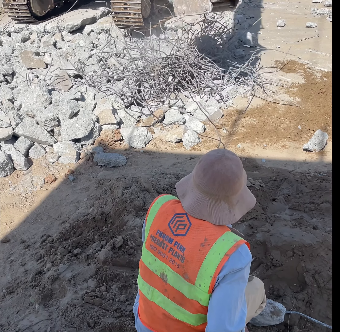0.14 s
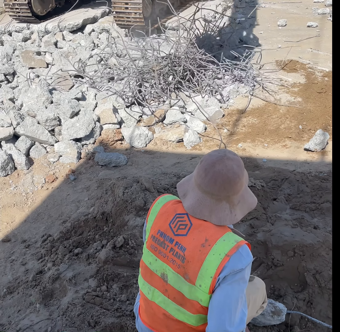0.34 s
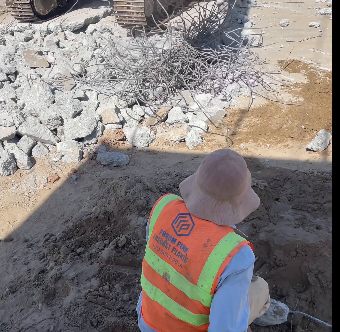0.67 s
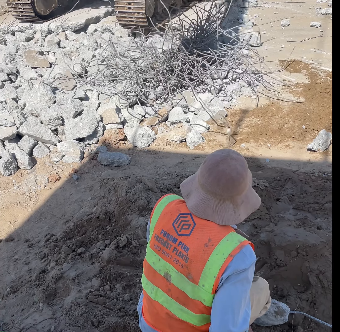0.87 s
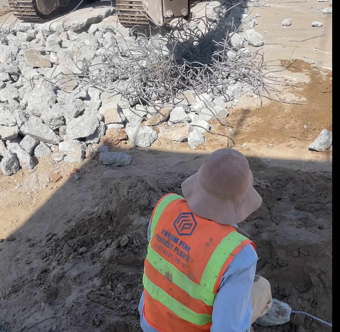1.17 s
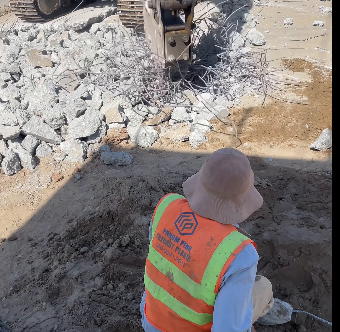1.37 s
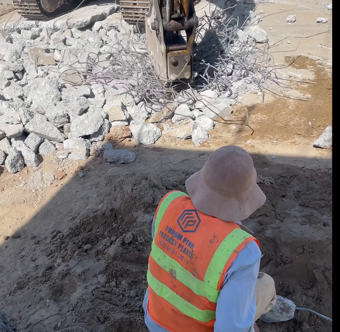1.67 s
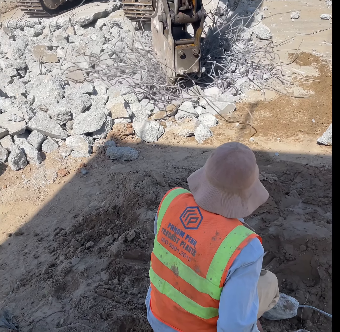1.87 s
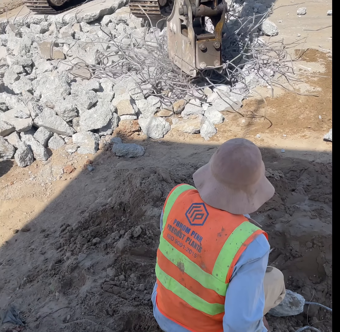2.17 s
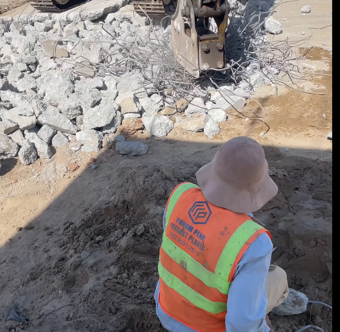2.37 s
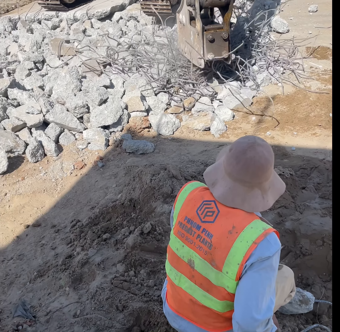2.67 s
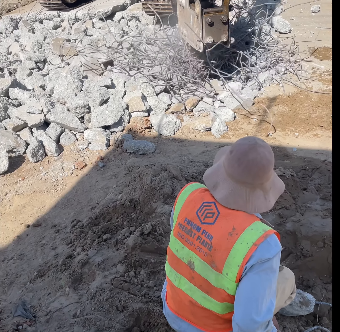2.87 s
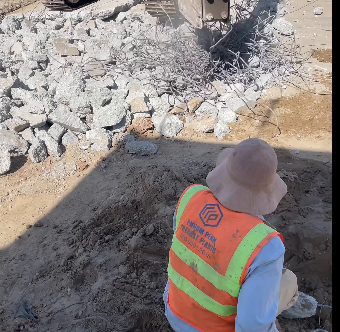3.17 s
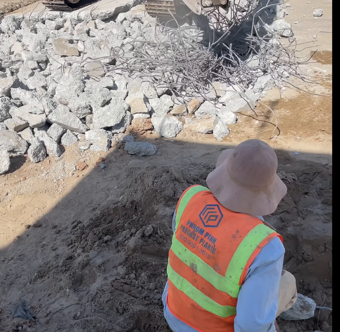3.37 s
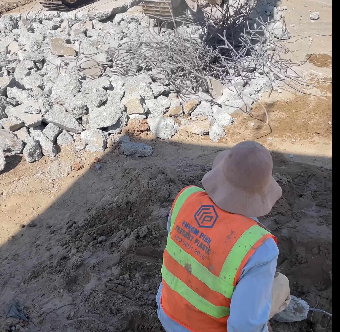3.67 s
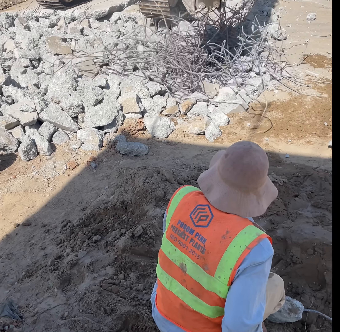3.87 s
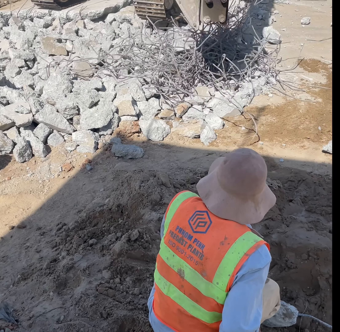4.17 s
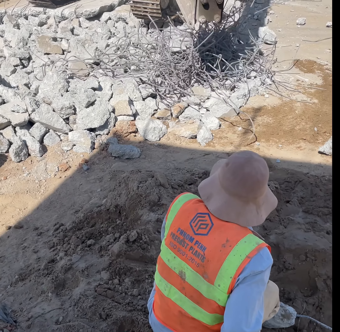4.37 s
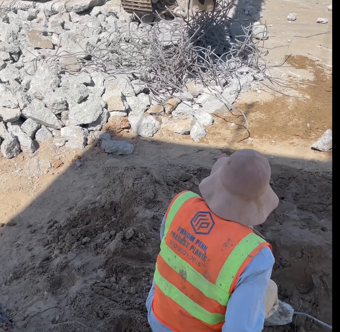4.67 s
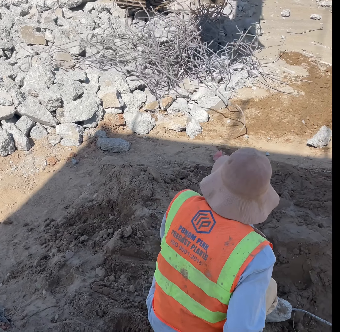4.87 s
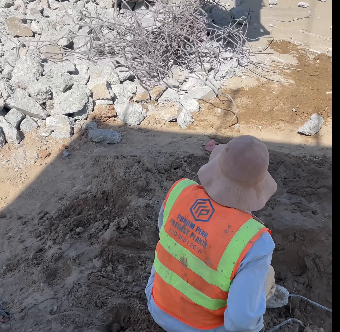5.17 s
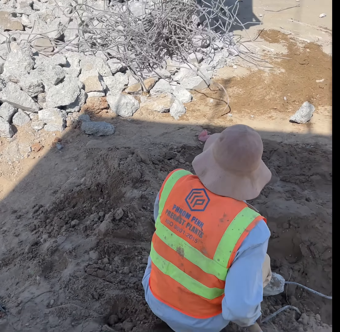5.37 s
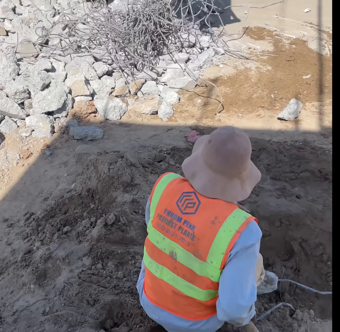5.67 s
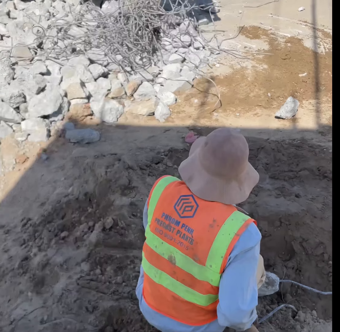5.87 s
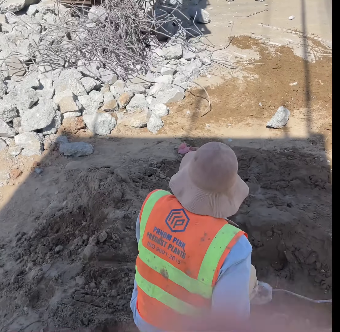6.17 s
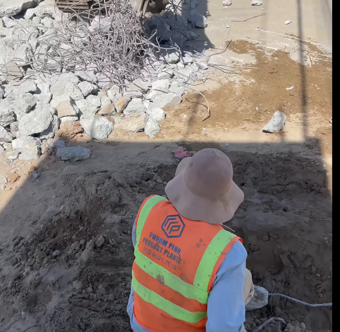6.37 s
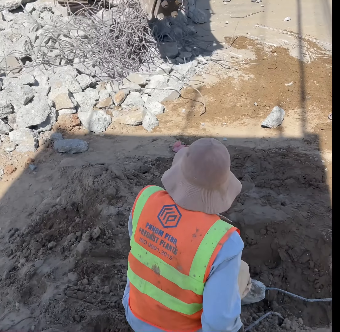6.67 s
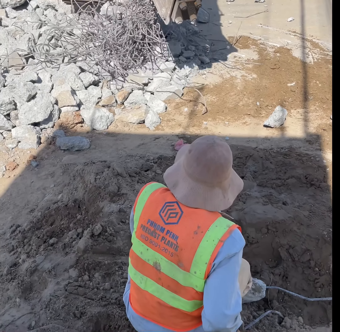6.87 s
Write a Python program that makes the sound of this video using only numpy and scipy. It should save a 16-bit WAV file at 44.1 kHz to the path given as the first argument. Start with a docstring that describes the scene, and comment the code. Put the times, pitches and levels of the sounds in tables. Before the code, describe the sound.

Outdoors, steel jaws break reinforced concrete over a throbbing engine: hard cracks, clanking knocks, ringing rebar and rubble trickling between uneven bites.

```python
"""Excavator crunching reinforced concrete

Outdoors, taken on two microphone ports close together. A diesel drones as wavering tones over throbbing noise,
with a pump whine. The steel jaw crunches concrete: bursts of coloured noise rumble, crumble and pour as grit.
Cracks are decaying noise, knocks and thuds short damped tones; struck and rubbed reinforcing bars
ring as resonant modes. Each source has a direct part and a part scattered by other paths."""
import sys
import numpy as np
from scipy import signal
from scipy.fft import rfft, irfft, next_fast_len
from scipy.io import wavfile
from scipy.ndimage import uniform_filter1d

SR = 44100
rng = np.random.default_rng(int(sys.argv[2]) if len(sys.argv) > 2 else 0)


def store_pcm(level_fs):
    """Save levels as 16-bit WAV."""
    pcm = np.round(np.clip(level_fs, -1, 1) * 32767).astype(np.int16)
    wavfile.write(sys.argv[1], SR, np.atleast_2d(pcm).T)


N = 310023  # length [samples]


def amp(db):
    """Decibels to amplitude."""
    return 10 ** (np.asarray(db) / 20)


def evened(x):
    """Scales x to rms 1."""
    return x / np.sqrt(np.mean(x ** 2) + 1e-20)


def read(points, hz):
    """Reads a frequency curve, interpolated along log frequency."""
    f, value = np.transpose(points)
    return np.interp(np.log(hz + 1), np.log(f + 1), value)


def columns(rows):
    """Each column of a table over time, one value a sample."""
    s, *rest = np.transpose(rows)
    return [np.interp(np.arange(N) / SR, s, c) for c in rest]


def colour(x, points):
    """Shapes x by a spectrum in dB."""
    size = next_fast_len(x.shape[-1])
    gain = amp(read(points, np.fft.rfftfreq(size, 1 / SR)))
    return irfft(rfft(x, size) * gain, size)[..., :x.shape[-1]]


def drift(width_s):
    """Slow random wander of rms 1."""
    size = max(int(width_s * SR), 1)
    once = uniform_filter1d(rng.standard_normal(N), size)
    return evened(uniform_filter1d(once, size))


def grains(per_s, spread_db, fade_s):
    """Noise in bursts of uneven size; direct and scattered sound share the bursts, not the fine noise."""
    sizes = amp(2 * spread_db * np.minimum(rng.exponential(1, N), 4))
    starts = (rng.random(N) < per_s / SR) * sizes
    power = signal.lfilter([1], [1, -np.exp(-1 / (fade_s * SR))], starts)
    power = uniform_filter1d(power, max(int(0.62 * fade_s * SR), 1))  # each burst starts softly
    return np.sqrt(abs(power)) * rng.standard_normal((2, N))


def ring(force, hz, t60):
    """One damped mode; a unit click rings with height about 1."""
    r, turn = np.exp(-np.log(1000) / (t60 * SR)), 2 * np.pi * hz / SR
    return signal.lfilter([0, np.sin(turn)], [1, -2 * r * np.cos(turn), r * r], force)


def uneven_blows(shape, most):
    """Blow strengths with a random sign for each path; most caps the random size."""
    return amp(3.5 * np.minimum(rng.exponential(1, shape), most)) * rng.choice([-1, 1], (2, *shape))


def add_at(out, s, sound):
    """Lays a sound into out from time s."""
    start = round(s * SR)
    out[:, start:start + sound.shape[-1]] += sound


def wavering_tone(angle, db):
    """A sine whose level wavers at random; its scattered part also drifts in phase."""
    wander = np.array([[0], [2.5]]) * drift(0.052)  # radians rms
    level = amp(db + 2.5 * drift(0.049))
    return np.sqrt(2) * level * np.sin(angle + wander)


# exhaust tones: (time [s], firing rate [Hz], firing tone level [dB], half-rate tone level [dB])
ENGINE_COURSE = [(0, 115.1, -26, -27.5), (.3, 116.3, -33.5, -36), (.6, 108.6, -25.5, -33),
                 (.95, 106.7, -27, -29), (1.38, 106.6, -23.5, -26.5), (1.68, 111.4, -32.5, -31),
                 (1.8, 107.5, -23, -27.5), (2.05, 100.9, -29, -30), (2.33, 98.94, -22, -28.5),
                 (2.62, 108.4, -25.5, -29), (2.96, 115.9, -32, -26.5), (3.28, 114.7, -31, -25),
                 (3.5, 106.3, -23, -31), (3.78, 106.4, -24, -27.5), (4.0, 107.2, -17, -23),
                 (4.42, 105.4, -37, -36), (4.8, 104.2, -25.5, -34), (5.2, 103, -29, -38),
                 (5.55, 100.9, -27.5, -36), (5.78, 102.8, -27, -29), (6.3, 109, -24, -27),
                 (6.7, 108.4, -26, -38), (7.03, 108, -22.5, -26)]
# exhaust, fan and casing noise: (frequency [Hz], relative density [dB per Hz])
ROAR_SPECTRUM = [(15, -45), (25, -22), (48, 3), (76, -1), (108, -3), (137, -3), (200, -10.5), (245, -5.5),
                 (290, -12.5), (323, -12.5), (649, -20), (987, -17), (2340, -46), (2560, -34), (2880, -31),
                 (3720, -36.5), (6500, -34.5), (8450, -76), (14300, -120)]
ROAR_DB = -26.5


def engine():
    """Diesel: tones at the firing rate and half of it, over a roar that throbs with each firing."""
    hz, firing_db, half_db = columns(ENGINE_COURSE)
    turns = 2 * np.pi * np.cumsum(hz * (1 + 0.009 * drift(0.017))) / SR
    tones = wavering_tone(turns, firing_db) + wavering_tone(turns / 2, half_db)
    throb = 1 + 0.19 * np.cos(turns) + 0.098 * np.cos(turns / 2)
    roar = colour(throb * rng.standard_normal((2, N)), ROAR_SPECTRUM)
    return tones + amp(ROAR_DB + 0.27 * drift(0.086)) * evened(roar)


# hydraulic pump whine, following the load on the arm: (time [s], pitch [Hz], level [dB])
PUMP_COURSE = [(0, 364, -60), (.2, 362.6, -34.5), (.65, 359.7, -42), (1.05, 319.2, -29.5), (1.3, 336, -65),
               (1.9, 335.3, -35.5), (2.55, 301.7, -30), (2.7, 351, -36), (3.1, 364.4, -28), (3.4, 364, -36),
               (3.65, 352, -41.5), (4.2, 347.2, -29), (4.5, 308, -32), (4.62, 343.8, -37), (5, 330.7, -33),
               (5.6, 330, -47), (7.03, 339.4, -40)]


def pump():
    """Hydraulic whine: one tone, unsteady in pitch, level and phase."""
    hz, db = columns(PUMP_COURSE)
    strokes = 2 * np.pi * np.cumsum(hz * (1 + .022 * drift(.03))) / SR
    return wavering_tone(strokes, db)


# rubble trickling between bites:
# (time [s], heavy chunks [dB], concrete [dB], fine grit [dB], loose bars [dB])
TRICKLE_GAINS = [(0, -29.5, -33.5, -33, -58), (.5, -29, -36.5, -42, -54), (1.1, -28.5, -34.5, -46.5, -41),
                 (1.7, -26.5, -26, -33.5, -36), (2.4, -30, -33, -43, -43), (2.9, -29, -32.5, -32, -40),
                 (3.25, -27, -32.5, -28, -37), (3.66, -26.5, -36.5, -36.5, -44),
                 (4.0, -22.5, -29.5, -29, -33.5), (4.7, -35.5, -29, -41, -49), (5.25, -32, -33.5, -38, -50),
                 (5.6, -29.5, -34.5, -34, -57), (6.05, -37, -33, -26.5, -29.5),
                 (6.6, -28, -34.5, -31, -37.5), (7.03, -41, -34, -32.5, -44)]
# bites and drags of the jaw:
# (start [s], held [s], heavy chunks [dB], concrete [dB], fine grit [dB], loose bars [dB])
JAW_BITES = [(0, 0.01, -28, -37, -22, -53), (.27, 0.16, -30, -37, -35, -53),
             (1.13, 0.21, -40, -45, -27, -42), (1.349, 0.18, -36, -25.5, -19.5, -24.5),
             (1.563, 0.024, -17.5, -13, -35, -22), (1.64, 0.089, -20.5, -25.5, -47, -40),
             (1.82, 0.042, -42, -26.5, -29, -45), (1.931, 0.11, -40, -20.5, -22, -25.5),
             (2.208, 0.079, -42, -27, -34, -43), (2.5, 0.029, -23.5, -36, -39, -49),
             (2.595, 0.028, -29, -21, -30, -25), (2.631, 0.059, -25, -16.5, -31, -30),
             (3.002, 0.083, -39, -30.5, -26.5, -32), (3.27, 0.083, -36, -36, -25.5, -31.5),
             (3.75, 0.052, -34, -28.5, -24.5, -31), (3.828, 0.099, -20.5, -29.5, -26.5, -44),
             (4.134, 0.074, -28, -18.5, -47, -44), (4.248, 0.053, -35, -16, -27.5, -42),
             (4.31, 0.1, -30, -20.5, -35, -35), (4.42, 0.096, -40, -19.5, -33, -28.5),
             (4.619, 0.033, -69, -24, -37, -32), (4.874, 0.04, -24, -23.5, -33.5, -50),
             (4.978, 0.07, -31.5, -23.5, -32.5, -54), (5.17, 0.079, -33, -37, -53, -46),
             (5.3, .03, -31, -53, -34, -54), (5.39, 0.13, -38, -47, -30.5, -50),
             (5.87, .03, -38, -28.5, -35, -49), (5.919, 0.038, -21, -33, -25, -44),
             (6.04, 0.11, -32, -28.5, -30, -30.5), (6.14, 0.1, -36, -23, -37, -31),
             (6.31, 0.049, -35, -23.5, -35, -40), (6.55, 0.058, -34, -54, -49, -52),
             (6.8, 0.087, -27.5, -47, -30.5, -49)]
# dying down after a bite: chunks, concrete, grit, bars [dB per s]
SETTLING = [252, 214, 148, 117]
DIG_SHARE = 0.32  # share of the held time in which a bite swells up


def work():
    """Gains of chunks, concrete, grit and bars: a trickle, and each bite digs in, holds and settles."""
    t = np.arange(N) / SR
    power = amp(columns(TRICKLE_GAINS)) ** 2
    for s, held_s, *db in JAW_BITES:
        span = slice(round(s * SR), round((s + held_s) * SR) + SR // 3)
        since = t[span] - s
        fall_db = np.outer(SETTLING, np.maximum(since - held_s, 0))
        swell = np.clip(since / (DIG_SHARE * held_s), 0, 1)
        power[:, span] += (amp(np.c_[db] - fall_db) * swell) ** 2
    return np.sqrt(power)


# modes of the bars and the jaw: (frequency [Hz], relative level [dB], t60 [s])
STEEL_MODES = [(548, -1, .3), (616, -4, .25), (683, -3, .25), (805, -2, .25), (1040, -5, .12),
               (1255, -4, .12), (1420, -1, .12), (1510, -5, .12), (1670, -9, .15), (1829, -4, .3),
               (2075, -7, .2), (2430, -9, .15), (2735, -10, .15), (3280, -12, .12), (3655, -9, .15),
               (4150, -11, .15), (4700, -14, .12), (5122, -14, .2), (5415, -12, .15)]


def shaken_steel(force):
    """All modes of the bars and the jaw, driven by one force."""
    return sum(amp(db) * ring(force, hz, t60) for hz, db, t60 in STEEL_MODES)


def knocking_lumps():
    """Lumps knock together at random moments, each size ringing at its own pitch."""
    at = rng.integers(0, N, (12, 420))
    blows = uneven_blows(at.shape, most=2.5)
    lumps = np.zeros((2, N))
    for k, hz in enumerate(np.geomspace(550, 2900, len(at))):
        clicks = np.zeros((2, N))
        clicks[:, at[k]] = blows[:, k]
        lumps += ring(clicks, hz, t60=0.038)
    return evened(lumps)


# colours of heavy chunks, crumbling concrete and fine grit: (frequency [Hz], relative density [dB per Hz])
CHUNK_SPECTRUM = [(40, -17), (90, -2.5), (250, 13), (420, 7), (700, -16.5), (1500, -36)]
CRUNCH_SPECTRUM = [(200, -10), (500, -0.5), (900, 8.5), (1450, 3), (2200, 1), (2750, 0.5), (3100, -1.5),
                   (5000, -5.5), (8000, -14), (16000, -63)]
GRIT_SPECTRUM = [(1200, -38), (2500, 0), (4000, -3.5), (5000, 0), (6500, 3), (9000, -4.5), (11500, -9),
                 (13200, -17), (16000, -22)]


def rubble():
    """Heavy chunks rumble, concrete crumbles and shakes the bars, grit pours in fine ticks."""
    chunks_gain, crunch_gain, grit_gain, _ = work()
    t = np.arange(N) / SR
    breaks = np.array([row[0] for row in CRACKS] + [np.inf])
    until = breaks[np.searchsorted(breaks, t)] - t
    # the concrete holds for a moment before it breaks
    crunch_gain = crunch_gain * amp(-2.5 * np.clip(1 - until / 0.0053, 0, 1))
    chunks = evened(colour(grains(per_s=55.0, spread_db=-4.5, fade_s=0.025), CHUNK_SPECTRUM))
    crumbs = evened(grains(per_s=220., spread_db=2.5, fade_s=0.018))
    crackle = evened(grains(per_s=260., spread_db=3.5, fade_s=0.0018))  # single flakes splitting off
    crumbs = evened(crumbs + amp(-5.) * crackle) * crunch_gain
    level = np.sqrt(np.mean(crumbs ** 2))
    steel = shaken_steel(crumbs[::-1])  # direct and scattered noise swapped
    crunch = level * (evened(colour(crumbs, CRUNCH_SPECTRUM)) + amp(-5.5) * evened(steel))
    crunch += amp(-5.5) * crunch_gain * knocking_lumps()
    grit = evened(colour(grains(per_s=430.0, spread_db=4.5, fade_s=0.019), GRIT_SPECTRUM))
    return chunks_gain * chunks + crunch + grit_gain * grit


def loose_bars(count=20):
    """Loose bars knock at random, in the tangle's upper modes and at pitches of their own."""
    out = np.zeros((2, N))
    own = np.geomspace(1800, 6500, count) * rng.uniform(0.87, 1.03, count)
    upper = [hz for hz, _, _ in STEEL_MODES if hz > 3500]
    for hz, db in [(f, 0) for f in own] + [(f, 5.) for f in upper]:
        at = rng.integers(0, N, 400)
        clicks = np.zeros((2, N))
        clicks[:, at] = uneven_blows(at.shape, most=3)
        out += amp(db - 1.4 * np.log2(hz / 1600)) * ring(clicks, hz, t60=0.095)
    return work()[-1] * evened(out)


# one bar mode singing out of the tangle: (time [s], pitch [Hz], level [dB], time it is rubbed [s])
BAR_SONGS = [(0.95, 3400, -43, 0.013), (1.6, 2900, -27, 0.027), (1.665, 2800, -28, .015),
             (1.69, 2720, -30, .02), (1.599, 6540, -19, 0.016), (1.812, 5460, -32, 0.023),
             (1.836, 1460, -31, 0.02), (2.036, 4186, -35, 0.026), (3.735, 1663, -35, 0.033),
             (4.171, 399, -21.5, 0.077), (3.9, 2600, -34, .02), (4.274, 4170, -32, .05),
             (4.33, 4170, -31, .04), (4.285, 5900, -31.5, .11), (4.275, 4100, -27, 0.065),
             (4.34, 3600, -34, .04), (4.3, 5410, -24, 0.034), (4.25, 4800, -30, 0.022),
             (4.26, 3800, -31, .06), (4.325, 4400, -33, .02), (4.335, 3400, -31, 0.036),
             (4.34, 5410, -38, .06), (4.412, 6200, -31.5, .02), (4.462, 5400, -30, .025),
             (4.451, 555, -31, 0.26), (4.33, 1829, -31, .11), (4.31, 2075, -32, .07),
             (4.54, 1829, -33, .07), (5.09, 1829, -36, .09), (5.06, 4150, -37, .09),
             (4.48, 4770, -29.5, 0.027), (3.8, 1420, -27, 0.046), (4.372, 4700, -30, 0.0208),
             (4.835, 2200, -34, .015), (4.898, 5000, -36, 0.041), (4.901, 3300, -33, .043),
             (4.9, 547, -33, .3), (4.987, 1248, -27, 0.054), (5.057, 3620, -27, 0.0151),
             (5.077, 3580, -25, 0.012), (5.116, 3690, -29, .014), (4.935, 2330, -36, 0.057),
             (5.4, 1200, -32, .03), (5.06, 1420, -30, 0.048), (5.866, 3630, -34, 0.032),
             (6.056, 4150, -28, 0.027), (6.07, 5060, -35, .025), (6.07, 4780, -33, .04),
             (6.105, 3280, -34, .035), (6.135, 5350, -36, .025), (6.213, 3830, -26, .012),
             (6.235, 5140, -32, .03), (6.18, 4050, -30, .02), (6.108, 749, -23.5, 0.052),
             (6.08, 3600, -31, .03), (6.115, 3600, -29, .024), (6.148, 3600, -28, 0.0119),
             (6.172, 682, -25, 0.035), (6.238, 616, -29, .06), (6.175, 3670, -20.5, 0.019),
             (6.187, 5420, -25, .016), (6.208, 5380, -24, .01), (6.207, 4100, -27.5, 0.026),
             (6.27, 5400, -34, .025), (7, 3630, -32, .03), (6.317, 2000, -33, 0.015),
             (6.17, 1900, -31, .04), (6.34, 2300, -34, .05), (6.325, 780, -32, 0.04),
             (6.549, 835, -36, .029), (6.75, 206.5, -33, 0.41)]
RING_CYCLES, LONGEST_T60_S = 270., .075  # a mode's t60 in cycles, and its upper limit
RUB_FADE_DB = -1.5  # change of the rubbing force over the rub


def singing_bars():
    """A struck bar sings roughly while a stick-slip force rubs it, then rings out."""
    out = np.zeros((2, N + SR))
    for s, hz, db, rub_s in BAR_SONGS:
        t = np.arange(0, rub_s + .12, 1 / SR)
        slips = rng.standard_normal((2, len(t))) * amp(-60 * np.maximum(t - rub_s, 0) / 0.024)
        # part of the slipping locks to the mode, more in thin high bars
        slips += 0.1 * hz / 5000 * np.sin(2 * np.pi * hz * t) * (t < rub_s)
        slips[:, 0] = 9.0  # the first blow
        grip = evened(uniform_filter1d(rng.standard_normal(len(t)), 200))  # comes and goes
        slips *= amp(RUB_FADE_DB * t / rub_s + 2. * grip)
        t60 = min(RING_CYCLES / hz, LONGEST_T60_S)
        twin = ring(slips, hz * 1.028, 0.4 * t60)  # a close, more damped mode
        song = ring(slips, hz, t60) + 0.4 * twin
        rubbed_rms = np.sqrt(np.mean(song[:, t < rub_s + .01] ** 2))
        add_at(out, s, amp(db) * song / rubbed_rms)
    return out[:, :N]


# a slab drops and rocks: (time [s], level before damping [dB], pitch [Hz])
SLAB_THUDS = [(2.668, -9, 363), (2.675, -11.5, 440), (3.831, -14, 250), (3.836, -8, 75), (3.839, -9.5, 265),
              (3.853, -7, 230), (3.895, -17, 368), (3.904, -11, 110), (3.92, -18, 380), (3.949, -12, 240),
              (3.99, -14, 95)]


def thuds():
    """Low damped pushes of a slab on the ground; deeper ones last longer."""
    out, t = np.zeros((2, N)), np.arange(SR // 5) / SR
    for s, db, hz in SLAB_THUDS:
        t60 = 0.035 + 5.8 / hz
        push = amp(db - 60 * t / t60) * np.minimum(t / 0.0015, 1)
        add_at(out, s, push * np.sin(2 * np.pi * hz * t))
    return out


# sharp snaps of small stones: (time [s], peak level [dB])
STONE_SNAPS = [(0.013, -17), (0.91, -25), (1.3017, -8), (1.3449, -9), (1.4058, -6.5), (1.5758, -11),
               (1.718, -10.5), (1.925, -11.5), (2.134, -14.5), (2.2712, -19), (2.39, -20), (2.597, -25),
               (2.9532, -18), (4.0571, -13), (4.135, -10.5), (5.3004, -20), (5.396, -16), (5.474, -16),
               (5.7533, -16.5), (6.067, -16.5)]


def snaps():
    """Small stones snap: short decaying noise in the colour of grit."""
    out, t = np.zeros((2, N + SR)), np.arange(SR // 4) / SR
    for s, db in STONE_SNAPS:
        noise = colour(rng.standard_normal((2, len(t))), GRIT_SPECTRUM)
        snap = noise * amp(-60 * t / 0.14) * np.minimum(t / 0.0047, 1)
        add_at(out, s, amp(db) * snap / abs(snap).max())
    return out[:, :N]


# hard knocks of concrete lumps on the jaw: (time [s], peak level [dB], pitch [Hz], contact [s])
JAW_KNOCKS = [(0.629, -27.5, 2920, 0.0058), (1.4197, -12, 1490, 0.0039), (1.571, -12, 1090, 0.0057),
              (1.583, -13, 1200, .005), (1.594, -12, 1500, .004), (1.617, -14, 1500, .006),
              (1.638, -14, 1500, .005), (1.6702, -8, 1410, .004), (1.702, -18, 3410, .004),
              (1.719, -9, 1290, 0.0051), (1.722, -15, 2600, .006), (1.832, -18.5, 1450, 0.0085),
              (1.984, -17, 1500, 0.0067), (2.012, -16, 1880, .006), (2.033, -15, 1900, .004),
              (2.056, -16, 1090, .007), (2.428, -15, 2450, 0.0067), (2.644, -9, 1510, .003),
              (2.6751, -13.5, 2450, .009), (4.1375, -11.5, 850, 0.013), (4.155, -13, 1070, 0.0049),
              (4.173, -8, 1250, .004), (4.191, -13, 1020, .005), (4.2517, -2, 1420, .0045),
              (4.26, -12, 1650, 0.0062), (4.265, -10.5, 791, 0.0069), (4.279, -11, 1390, .005),
              (4.284, -16, 2650, .006), (4.293, -13, 1000, .005), (4.332, -15, 1000, .006),
              (4.3979, -13, 799, .003), (4.4127, -12.5, 1500, 0.0053), (4.459, -13, 1440, 0.0065),
              (4.47, -5, 1310, .0034), (4.4791, -10, 1390, .006), (4.499, -3, 1370, .0034),
              (4.5095, 0, 1436, .0075), (4.527, -12, 1412, .006), (4.532, -14.5, 2650, .006),
              (4.534, -11, 1420, .004), (4.5778, -11.5, 1415, 0.0038), (4.5855, -15, 1260, .0036),
              (4.62, -15, 1360, .004), (4.634, -15.5, 1416, .01), (4.877, -16, 1435, 0.012),
              (4.878, -21, 2150, .01), (4.879, -21, 2700, .008), (4.914, -24, 2070, .01),
              (4.989, -12, 1260, .009), (5.0358, -10, 1458, .008), (5.875, -21.5, 1360, 0.0054),
              (6.1808, -13, 730, 0.011), (6.187, -17.5, 2000, .006), (6.3286, -11, 1277, 0.0083)]
KNOCK_T60_S, KNOCK_TAIL_DB = .03, -22
JAW_RING_DB = -10  # rms of the steel rung by the knocks, relative to the knocks' own


def knocks():
    """Each knock presses for its contact time, ringing a lump in two unrelated modes; the steel rings on."""
    out, t = np.zeros((2, N + SR)), np.arange(SR // 20) / SR
    chances = rng.random((len(JAW_KNOCKS), 2))
    for (s, db, hz, contact_s), (ratio, sign) in zip(JAW_KNOCKS, chances):
        upper = np.sin(2 * np.pi * hz * (1.7 + 0.32 * ratio) * t)
        tone = np.sin(2 * np.pi * hz * t) + 0.3 * upper
        press = np.sin(np.pi * np.clip(t / contact_s, 0, 1) ** 0.95)
        tail = amp(KNOCK_TAIL_DB - 60 * t / KNOCK_T60_S) * np.minimum(t / contact_s, 1)
        roughness = 1 + 0.68 * uniform_filter1d(rng.standard_normal((2, len(t))), size=9)
        knock = (press + tail) * roughness * tone
        add_at(out, s, np.sign(sign - .5) * amp(db) * knock / abs(knock).max())
    lumps = out[:, :N]
    lumps_rms = np.sqrt(np.mean(lumps ** 2))
    return lumps + amp(JAW_RING_DB) * lumps_rms * evened(shaken_steel(lumps))


# cracks and clanks: (time [s], crack peak level [dB], pitch struck most [Hz],
# treble relative to that pitch [dB], steel ring peak above the crack peak [dB])
CRACKS = [(0.628, -23.5, 1075, -3, -24), (1.294, -13, 1480, -28, -8), (1.406, -11, 1580, -18, -1),
          (1.568, -12, 1000, -5, -9), (1.668, -7.5, 1395, -13, -22), (1.718, -8.5, 1410, -16, -32),
          (1.822, -12, 1446, -26, -2.5), (1.925, -16.5, 1455, -15, 0.5), (1.982, -17, 1520, -26, -7),
          (2.054, -8.5, 1113, -13, -24), (2.136, -14, 1290, -21, -33), (2.217, -14, 1052, -11, -19),
          (2.428, -18.5, 2480, -25, -17), (2.6, -16, 1338, -1, -33), (2.644, -2.5, 2570, -8, -13),
          (3.252, -19, 1560, -34, -8), (3.736, -12, 1643, -4, -10), (3.919, -18, 817, -33, -17),
          (4.136, -0.5, 780, -15, -12), (4.251, -3, 1510, -23, -19), (4.367, -11, 858, -22, -1),
          (4.39, -11, 1400, -30, -5), (4.448, -14.5, 1424, -32, 3), (4.466, -8, 1360, -24, -2),
          (4.509, -10, 1426, -22, -19), (4.576, -7.5, 1410, -27, -11), (4.62, -12, 1350, -28, -12),
          (4.874, -11.5, 1408, -14, -19), (4.99, -16.5, 1138, -25, 2), (5.036, -12.5, 1420, -41, -0.5),
          (5.174, -19, 1187, -39, -5), (5.219, -14, 1045, -44, -10), (5.87, -19, 1410, -35, -5),
          (5.918, -28.5, 608, -10, 9), (6.105, -13.5, 848, -26, 1), (6.178, -6, 667, -16, -31),
          (6.325, -16, 1300, -30, -4)]
CRACK_T60_S = 0.15


def cracks():
    """A sudden decaying burst around its own pitch, ringing most the steel modes nearest to it."""
    out, t = np.zeros((2, N + SR)), np.arange(SR // 4) / SR
    # sharp break, crumbling tail
    fall = (amp(-60 * t / CRACK_T60_S) + 0.3 * amp(-60 * t / 0.03)) * np.minimum(t / 0.0078, 1)
    for s, db, hz, treble_db, ring_db in CRACKS:
        noise = rng.standard_normal((2, len(t)))
        spectrum = [(hz / 6, -24.), (hz / 1.25, -6.), (hz, 0), (hz * 1.25, -8.),
                    (5800, treble_db), (16000, treble_db - 33.0)]
        crack = evened(colour(noise, spectrum)) * fall
        force = noise * amp(-60 * t / 0.18)
        steel = np.zeros((2, len(t)))
        for mode_hz, mode_db, t60 in STEEL_MODES:
            if .4 < mode_hz / hz < 4:
                off_pitch_db = 11.0 * abs(np.log2(mode_hz / hz))
                steel += amp(mode_db - off_pitch_db) * ring(force, mode_hz, t60)
        sound = crack / abs(crack).max() + amp(ring_db) * steel / abs(steel).max()
        add_at(out, s, amp(db) * sound)
    return out[:, :N]


def scene():
    """Row 0 is the sound at the left port, row 1 the part that arrives scattered by other paths."""
    background = engine() + pump()
    debris = rubble() + loose_bars() + singing_bars() + thuds() + snaps()
    return background + debris + knocks() + cracks()


# colour of the microphone housing: (frequency [Hz], gain [dB])
HOUSING = [(12, -40), (32, -20), (45, -3), (4550, -2.5), (4850, -6), (5200, -4.5), (16000, -1)]
# left-right likeness of the coded stereo channels: (frequency [Hz], likeness [0 to 1])
LIKENESS = [(40, .8), (100, .72), (180, .5), (400, .7), (700, .55), (1050, .82), (1500, .87), (2100, .35),
            (4600, .35), (5200, .9), (6200, .78), (7000, .999), (8200, .999), (9300, .65), (10400, .999),
            (11700, .999), (12600, .55), (13400, .99), (15100, .999), (16000, .7)]
# phase by which the left channel leads, stepped by audio coding: (frequency [Hz], lead [radians])
LEFT_LEAD = [(0, 0), (300, -.2), (650, -1.7), (1150, -1.2), (2000, .3), (2600, .6), (3000, 3.2),
             (4500, 3.1), (4950, 6.4), (5500, 6.7), (7000, 9.42), (8200, 9.43), (10400, 12.56),
             (11800, 12.57), (13300, 15.7), (16000, 15.72)]
# level of the left channel above the right: (frequency [Hz], difference [dB])
LEFT_TILT = [(60, 1), (100, 2), (200, 2.5), (330, 5.5), (850, 6), (1100, 2.5), (1400, .5), (2200, 0),
             (16000, -.3)]
EDGE_HZ = 15760  # upper band limit


def record(dry):
    """The right channel is the left's sound shifted in phase, mixed with scattered sound; then the band limit."""
    size = next_fast_len(N + 4096)
    hz = np.fft.rfftfreq(size, 1 / SR)
    near, scattered = rfft(dry, size) * amp(read(HOUSING, hz))
    same = np.clip(read(LIKENESS, hz), 0, 1)
    tilt = amp(read(LEFT_TILT, hz) / 2)  # half the difference on each channel
    shift = np.exp(-1j * np.interp(hz, *np.transpose(LEFT_LEAD)))
    right = same * shift * near + np.sqrt(1 - same ** 2) * scattered
    channels = irfft(np.array([near * tilt, right / tilt]), size)[:, :N]
    channels = 1.2 * np.tanh(channels / 1.2)  # the input stage rounds off the loudest peaks
    lowpass = signal.firwin(1023, EDGE_HZ, window=("kaiser", 9), fs=SR)
    return signal.oaconvolve(channels, lowpass[None], "same", axes=1)


dry = scene()
out = record(dry)
store_pcm(out)
```